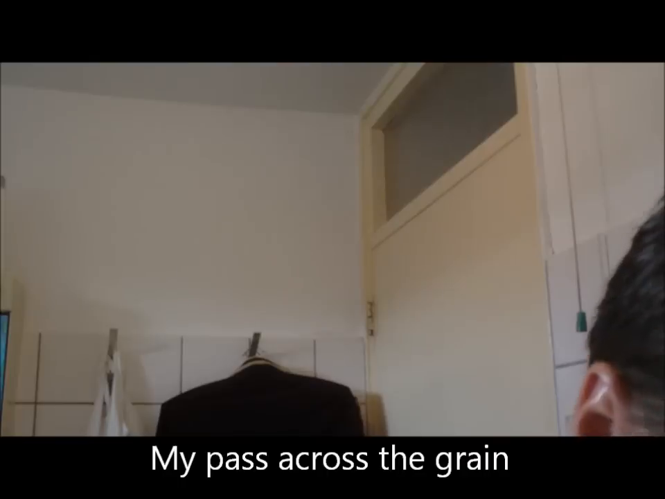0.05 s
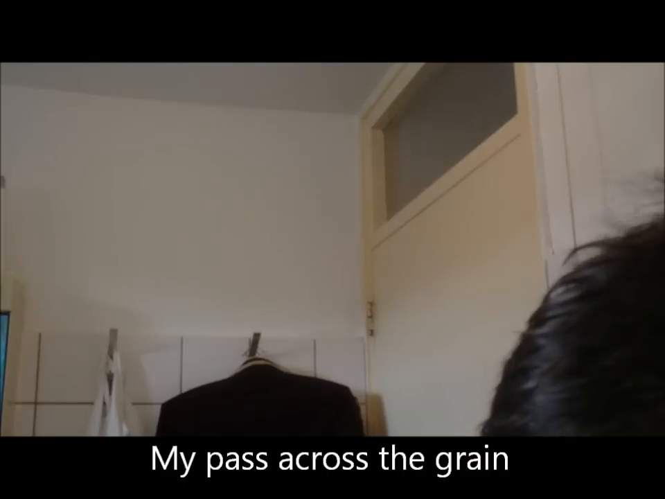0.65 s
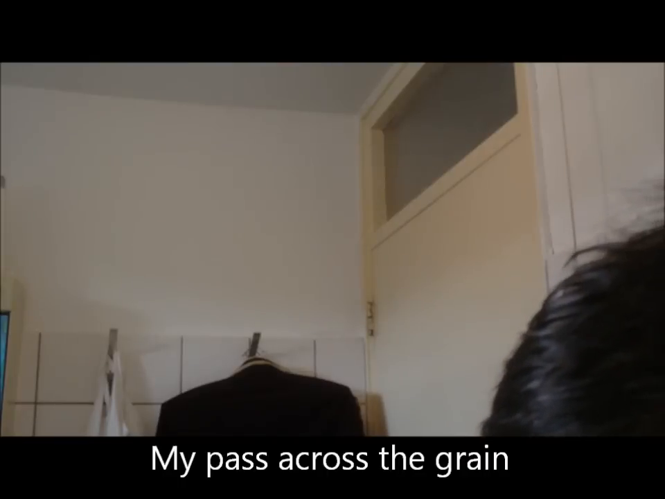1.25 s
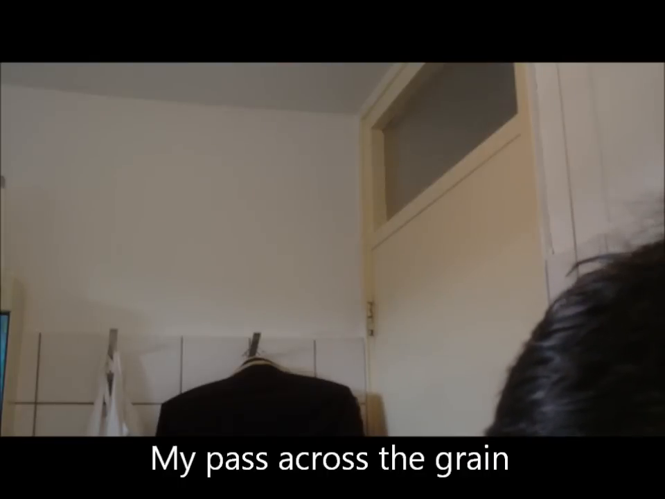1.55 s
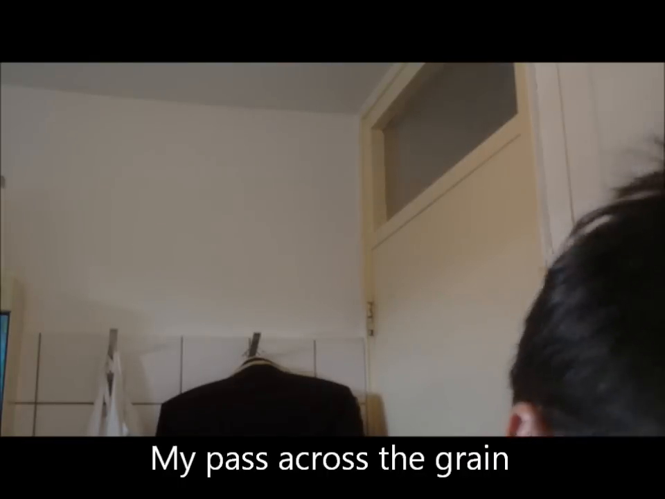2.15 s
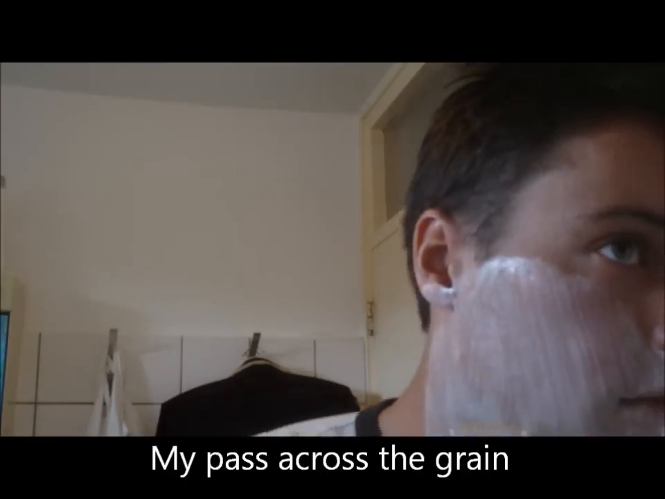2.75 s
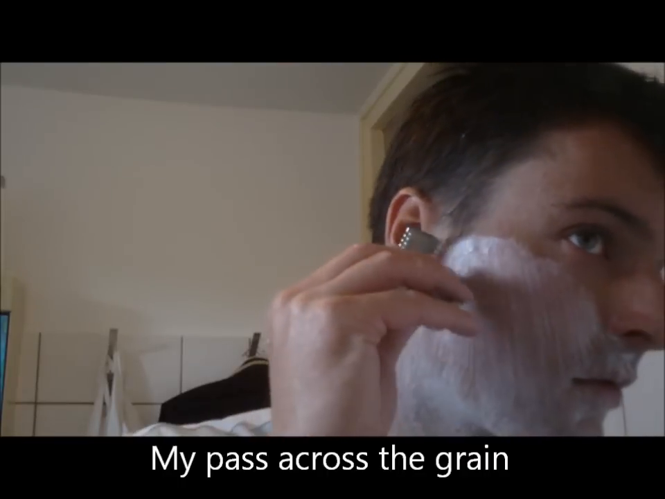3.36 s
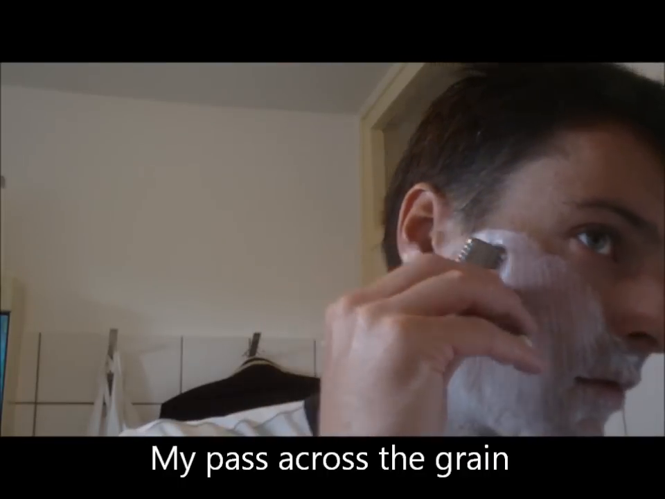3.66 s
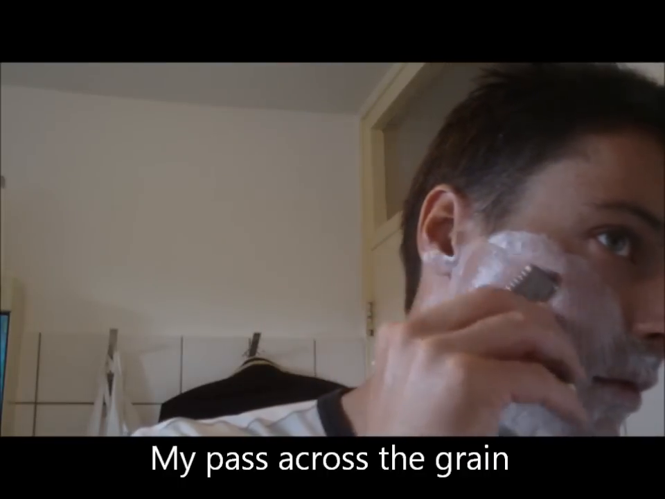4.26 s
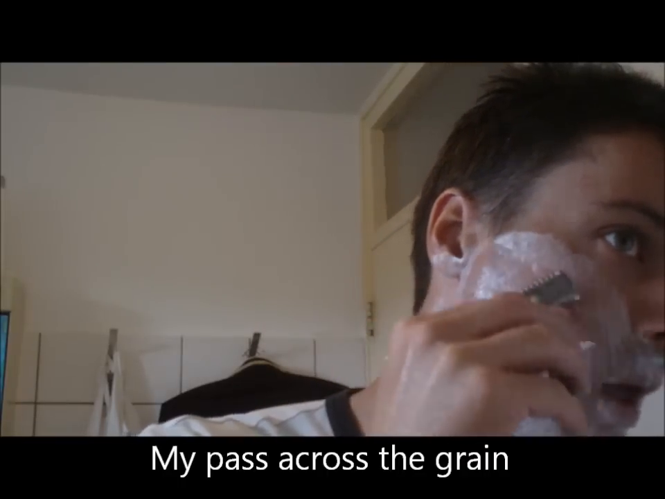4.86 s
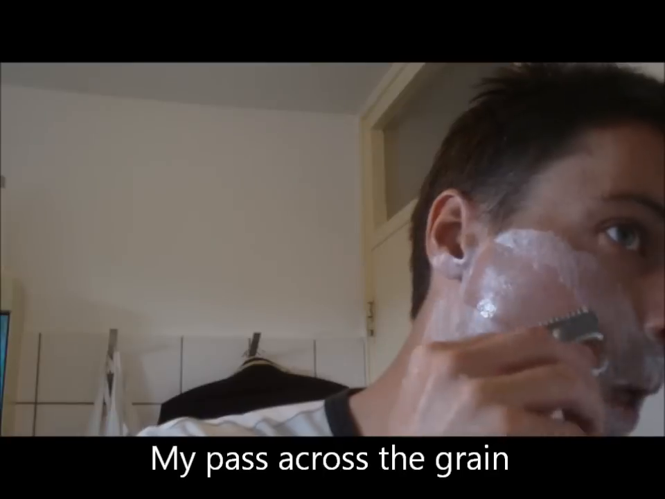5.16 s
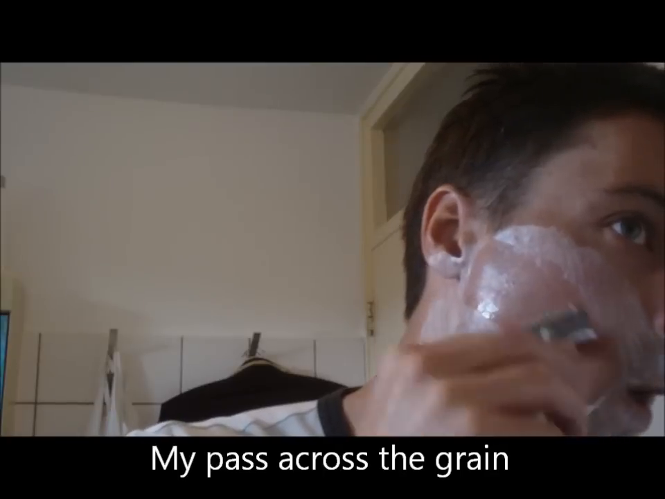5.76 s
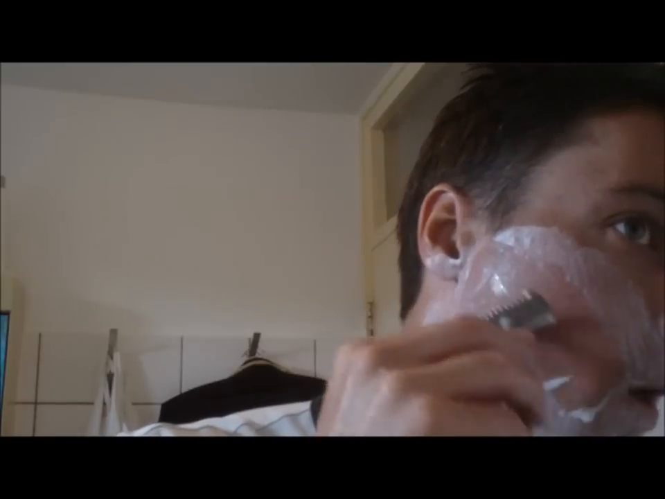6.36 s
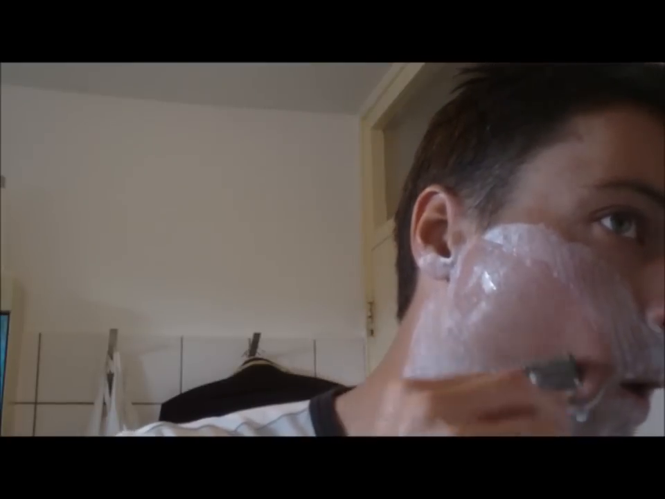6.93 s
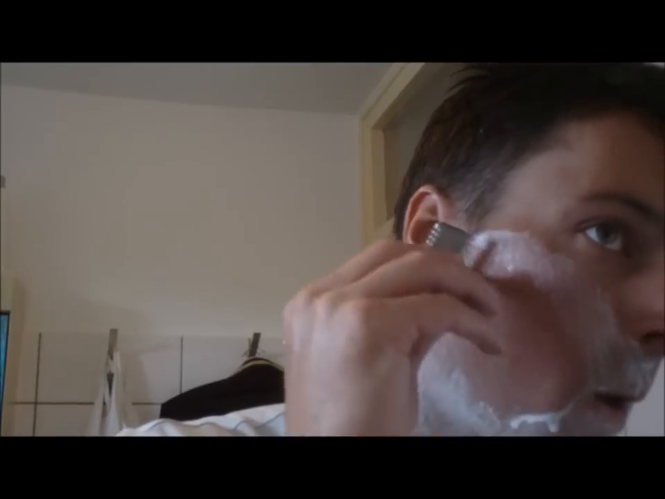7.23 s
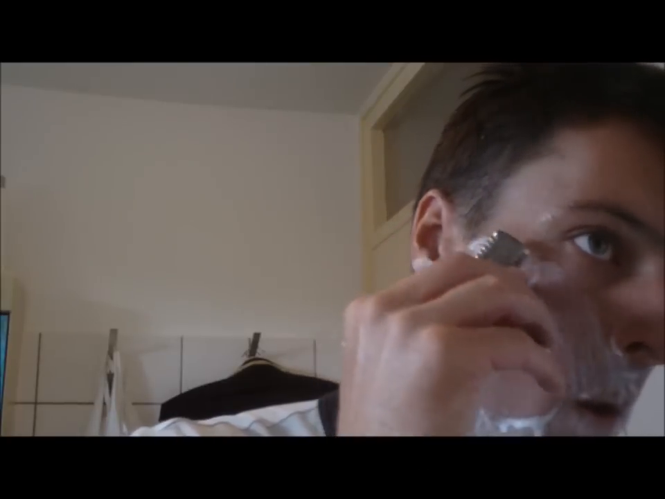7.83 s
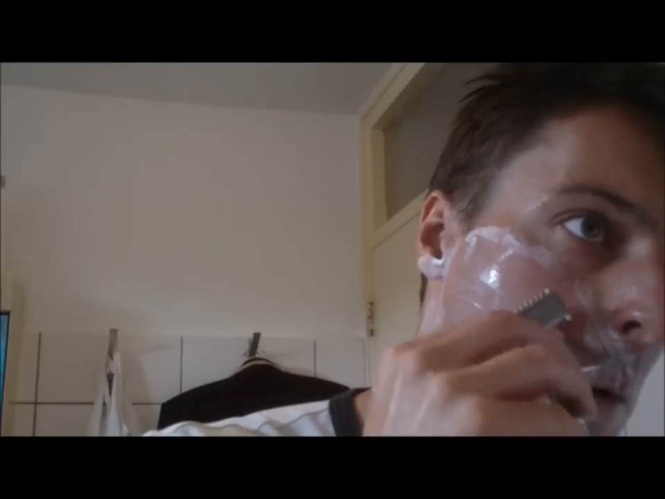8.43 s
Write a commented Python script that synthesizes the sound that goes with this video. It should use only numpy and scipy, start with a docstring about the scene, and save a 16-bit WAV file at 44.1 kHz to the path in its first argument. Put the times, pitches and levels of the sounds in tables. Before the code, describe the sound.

A light, dull knock on a basin opens the scene. At about 0.3 seconds a tap begins to hiss, and from 1 second the water splashes, bubbles and gurgles as a razor is rinsed in the stream. This is the loudest part, peaking between 2 and 2.5 seconds, then dying away by about 3.2 seconds as the tap closes. A handful of drops plink until nearly 4 seconds. From 3.5 seconds to the end, at around 8.6 seconds, the razor scrapes through lathered stubble in about a dozen short, quiet, crisp strokes, two or three a second. Tiny clicks and stray drips fall among them, notably near 4.9, 6.1 and 7.8 seconds. Everything sits straight ahead, with the short echo of a small tiled bathroom. A soft rush of air and a very faint high electrical whine lie underneath throughout.

```python
"""Water runs from a tap, splashing and gurgling as a razor is rinsed in a small tiled bathroom.
The tap is closed, a few last drops plink, and the razor scrapes through stubble in short strokes.
The water hisses in the spout and patters on the basin, and each bubble of trapped air rings like a
tiny bell. The scrape is many hairs snapping, over the hiss of the blade sliding through lather.
The walls echo it all, and a soft rush of air and a faint electrical whine lie underneath."""
import sys
import numpy as np
from scipy import signal
from scipy.fft import rfft, irfft, next_fast_len
from scipy.io import wavfile

SR = 44100
rng = np.random.default_rng(int(sys.argv[2]) if len(sys.argv) > 2 else 0)


def transcribe(signal):
    """Save signal, clipped to [-1, 1], as a 16-bit WAV file at the path in sys.argv[1]."""
    frames = np.atleast_2d(signal).T
    limited = np.clip(frames, -1, 1)
    pcm = np.round(limited * 32767).astype(np.int16)
    wavfile.write(sys.argv[1], SR, pcm)


N = 378819
TIME = np.arange(N) / SR

# two rinses of the razor in the stream, one list each: t/s, spray level/dB, froth level/dB
RINSES = [
    [(0.9, -50, -58), (1.07, -39, -46), (1.224, -48.5, -53), (1.448, -36.5, -40.5), (1.588, -35, -37),
     (1.838, -33.5, -33), (1.978, -41.5, -35), (2.13, -35.5, -58)],
    [(2.16, -42.5, -31.5), (2.22, -34, -35), (2.366, -41, -35.5), (2.472, -35, -29.5), (2.69, -36.5, -42),
     (2.842, -50, -52), (2.978, -48, -41.5), (3.142, -57, -56.5), (3.25, -60, -77)],
]


def from_db(db):
    """Turn decibels into a factor to multiply a sound by."""
    return 10 ** (np.asarray(db) / 20)


def rms_one(x):
    """Scale a sound so that its average power is 1."""
    return x / np.sqrt(np.mean(x ** 2) + 1e-20)


def level(times, db):
    """A volume curve through the given points, silent before and after them."""
    return from_db(np.interp(TIME, times, db, left=-200, right=-200))


def fade_in(start, attack_s):
    """A volume curve that is 0 until the start, then rises smoothly to 1."""
    return 1 - np.exp(-np.clip((TIME - start) / attack_s, 0, 20))


def at_hz(points, hz):
    """Look up a frequency in a table, blending between rows on a musical (log) scale."""
    points = np.array(points)
    return np.interp(np.log(hz + 1e-3), np.log(points[:, 0]), points[:, 1])


def coloured(x, spectrum):
    """Make some frequencies louder and others softer, then scale to power 1."""
    size = next_fast_len(N + SR // 10)
    gains = from_db(at_hz(spectrum, np.arange(size // 2 + 1) * SR / size))
    return rms_one(irfft(rfft(x, size) * gains, size)[:N])


def band(x, low_hz, high_hz, order=2):
    """Keep the part of a sound between two frequencies."""
    edges = [low_hz, min(high_hz, .45 * SR)]
    return signal.sosfilt(signal.butter(order, edges, "band", fs=SR, output="sos"), x)


def ring(x, hz, t60):
    """Each click in x starts a tone that fades by 60 dB in t60 seconds."""
    decay, turn = from_db(-60 / (t60 * SR)), 2 * np.pi * hz / SR
    return signal.lfilter([0, np.sin(turn)], [1, -2 * decay * np.cos(turn), decay * decay], x + 1e-18)


def resonate(x, modes):
    """Pick out the pitches at which an object rings, from rows of f/Hz, width/Hz, gain/dB."""
    return sum(from_db(db) * signal.lfilter(*signal.iirpeak(hz, hz / width, fs=SR), x)
               for hz, width, db in modes)


def add(out, start, sound):
    """Mix a sound in at a start time in seconds."""
    i = int(np.clip(round(start * SR), 0, N - 1))
    out[i:i + len(sound)] += sound[:N - i]


def grains(per_s, spread_db):
    """Clicks at random moments: many small, a few large."""
    draw = rng.uniform(-1, 1, N) * SR / per_s
    out, hit = np.zeros(N), np.abs(draw) < 1
    out[hit] = np.sign(draw[hit]) * from_db(spread_db * np.minimum(-np.log(np.abs(draw[hit])), 4))
    return out


def spurts(per_s, depth, fade_s):
    """An uneven volume curve that jumps up at random moments and quickly falls back."""
    starts = rng.random(N) < per_s / SR
    jumps = signal.lfilter([1], [1, -np.exp(-1 / (fade_s * SR))], starts + 1e-18)
    return rms_one(1 + depth * jumps)


def bubbles(rows, cycles, rise, splash, swell):
    """Each bubble swells, rings and climbs in pitch as it surfaces; its torn skin adds a spatter."""
    out, t = np.zeros(N), TIME[:SR // 8]
    chances, noises = rng.standard_normal(len(rows)), rng.standard_normal((len(rows), len(t)))
    for (start, hz, db), chance, noise in zip(rows, chances, noises):
        age = np.minimum(t * hz / cycles * from_db(1.5 * chance), 3)  # 1 after about `cycles` swings
        phase = 2 * np.pi * np.cumsum(hz * (1 + rise * (age - .15))) / SR
        onset = 1 - np.exp(-(phase / swell) ** 2)
        tone = from_db(-60 * age) * np.sin(phase)
        spatter = splash * from_db(-45 * age) * rms_one(band(noise, hz / 1.4, hz * 1.435, order=4))
        add(out, start, from_db(db) * onset * (tone + spatter))
    return out


def bubble_cloud(births, choices, pitches, cycles):
    """Each click in births rings as a small bubble, at the pitch that choices picks for it."""
    return sum(np.sqrt(hz) * ring(births * (choices == k), hz, cycles / hz)
               for k, hz in enumerate(pitches))


def snaps(rows, t60, width):
    """Sharp hits: each is a tiny burst of noise around its strongest frequency."""
    out, t = np.zeros(N), TIME[:SR // 20]
    for (start, db, hz), noise in zip(rows, rng.standard_normal((len(rows), len(t)))):
        burst = band(noise * from_db(-60 * t / t60), hz / (1 + width), hz * (1 + width))
        add(out, start, from_db(db) * burst / np.abs(burst).max())
    return out


def room_air():
    """A soft, low, steady rush, with a faint difference between the left and right channels."""
    # tone of the background: f/Hz, level/dB
    air_colour = [(20, -34), (40, -20), (65, -7.5), (110, -5.5), (180, -3.5), (380, -6), (900, -11.5),
                  (2000, -19), (4300, -20.5), (6500, -18.5), (10000, -26.5), (15000, -28)]
    middle = coloured(rng.standard_normal(N), air_colour)
    sides = from_db(-20) * coloured(rng.standard_normal(N), air_colour) * [[1], [-1]]
    return from_db(-57) * (middle + sides)


def whine():
    """A faint electrical whine: a thin, narrow hiss that comes in even pulses."""
    hz, width_hz, pulses_per_s = 6205, 486, 59.5
    pulses = 0.083 + (.5 + .5 * np.cos(2 * np.pi * pulses_per_s * TIME)) ** 3
    hiss = band(rng.standard_normal(N) * pulses, hz - width_hz / 2, hz + width_hz / 2)
    return from_db(-68) * rms_one(hiss)


def room_tail():
    """A wash of echoes that dies soonest in the highest notes and booms at a few low ones."""
    # how long the echoes last: f/Hz, time to fade by 60 dB/s
    fade_times = [(100, 0.28), (500, 0.38), (1300, 0.22), (3500, 0.29), (9000, 0.25), (16000, 0.11)]
    # standing waves, the notes that build up between the walls: f/Hz, width/Hz, gain/dB
    wall_notes = [(107, 7, 14), (214, 7, 5), (353, 18, 0), (433, 18, -4), (466, 12, -3), (706, 14, -3),
                  (856, 14, -3), (1044, 14, 0)]
    t, edges = TIME[:SR * 3 // 4], np.geomspace(70, 18000, num=13)
    tail = np.zeros(len(t))
    for low, high in zip(edges, edges[1:]):
        fade = from_db(-60 * t / at_hz(fade_times, np.sqrt(low * high)))
        tail += band(rng.standard_normal(len(t)), low, high) * fade
    tail *= 1 - np.exp(-t / 0.00042)
    boom = from_db(3) * resonate(1. * (t == 0), wall_notes)
    return tail / np.sqrt(np.sum(tail ** 2)) + boom


def bathroom(x, tail, echo_db):
    """A sound arrives directly, then bounces off the near tiles, then lingers as the tail."""
    # first echoes from the tiles: delay/s, gain before echo_db is applied
    tile_echoes = [(.0014, 0.028), (.0036, -0.074), (.0062, -0.053)]
    response = from_db(echo_db) * tail
    response[0] += 1  # the direct sound
    for delay, gain in tile_echoes:
        add(response, delay, from_db([echo_db]) * gain)
    return signal.fftconvolve(x, response)[:N]


def knock():
    """A dull bump sets the basin ringing briefly."""
    # two dull bumps close together: t/s, level/dB
    bumps = [(0.001, -41), (0.015, -41)]
    # notes of the basin: f/Hz, gain/dB, time to fade by 60 dB/s
    basin_notes = [(284.4, -7, 0.31), (347, 3, 0.074), (441, 4.5, 0.071), (620, 1.5, 0.021),
                   (920, -10, 0.03), (1020, 10, 0.013), (1740, -3, 0.057)]
    blows = np.zeros(N)
    for start, db in bumps:
        add(blows, start, from_db([db]))
    ringing = sum(from_db(db) * ring(blows, hz, t60) for hz, db, t60 in basin_notes)
    return band(ringing, 320, 6000)


def drips():
    """Dripping water and lather make small bubbles that plink."""
    # the plinks: t/s, f/Hz, level/dB
    plinks = [(3.225, 7500, -21.5), (3.307, 2200, -38), (3.612, 1840, -33), (3.655, 1410, -36.5),
              (3.68, 2780, -30.5), (3.705, 1970, -30), (3.634, 3780, -34.5), (3.797, 3170, -30),
              (4.816, 3130, -37.5), (4.893, 2200, -33.5), (5.092, 4770, -38), (6.079, 4720, -28),
              (6.879, 4370, -35), (7.187, 1430, -51), (8.256, 4240, -33)]
    return bubbles(plinks, cycles=44, rise=0.2, splash=0.32, swell=6)


def small_clicks():
    """Small sharp clicks: the razor touching the skin, a drop landing, lather popping."""
    # the clicks: t/s, peak level/dB, strongest f/Hz
    clicks = [(4.513, -38.5, 10200), (4.812, -29.5, 6500), (4.893, -30.5, 9800), (4.894, -22, 3340),
              (5.496, -41, 8000), (6.079, -28.5, 5400), (6.501, -39, 8000), (6.79, -43, 9000),
              (7.805, -31, 7100), (7.812, -26.5, 6760), (8.133, -39, 6960), (8.256, -38, 4360),
              (8.283, -33.5, 5800), (8.582, -36, 7000)]
    return snaps(clicks, t60=.013, width=0.3)


def razor_scrape():
    """The blade snaps hairs, more on a firm stroke, and hisses as it slides through lather."""
    # razor strokes: t/s, length of the pull/s, level/dB, hollow ring of the cheek/dB
    strokes = [(3.545, 0.25, -47.5, 4), (4.079, .24, -48, -16), (4.54, .19, -49, -13),
               (4.96, 0.084, -45, 2), (5.245, 0.078, -47.5, 10), (5.539, 0.069, -46.5, 12),
               (6.018, 0.24, -44, -2), (6.501, 0.15, -44, 2), (6.866, 0.1, -45, 6),
               (7.418, 0.2, -47.5, -12), (7.89, 0.1, -52.5, -8), (8.215, 0.072, -52, -13),
               (8.53, .09, -50, 0)]
    # tone of the scrape: f/Hz, level/dB
    stubble_colour = [(300, -34), (900, -19), (1900, -10.5), (2800, -5), (4500, -1), (7800, 3.5), (9200, 0),
                      (12000, -6.5), (15000, -1.5)]
    # ring of the razor head: f/Hz, width/Hz, gain/dB
    head_notes = [(2450, 37, 3.5)]
    bite_s, press_db, ease_db_per_s = 0.019, 4, 251
    cheek_hz, cheek_width_hz, treble_hz = 1380, 470, 10400
    stroke, hollow, bright, age = np.zeros(N), np.zeros(N), np.zeros(N), TIME[:SR]
    for start, length, db, cheek_db in strokes:
        # the blade bites, presses harder along the pull, then eases off
        bite = 1 - np.exp(-age / bite_s)
        press = from_db(-press_db * np.maximum(1 - age / length, 0) ** 2)
        ease = from_db(-ease_db_per_s * np.maximum(age - length, 0))
        pull = from_db(db) * bite * press * ease
        add(stroke, start, pull)
        add(hollow, start, from_db(cheek_db) * pull)
        add(bright, start, from_db(-3.5 - 0.31 * cheek_db) * pull)  # a hollower cheek sounds duller
    hairs_per_s = 700 + 3000 * np.sqrt(stroke / stroke.max())
    hairs = coloured(grains(hairs_per_s, spread_db=3) / np.sqrt(hairs_per_s), stubble_colour)
    tufts = spurts(per_s=60, depth=0.32, fade_s=.008)  # the blade catches on tufts
    lather = coloured(rng.standard_normal(N), stubble_colour)
    scrape = from_db(0.5) * hairs * tufts + from_db(-7) * lather
    treble = signal.sosfiltfilt(signal.butter(2, treble_hz, "high", fs=SR, output="sos"), scrape)
    cheek = band(scrape, cheek_hz - cheek_width_hz / 2, cheek_hz + cheek_width_hz / 2)
    return stroke * (scrape - treble + resonate(scrape, head_notes)) + bright * treble + hollow * cheek


def tap_jet():
    """Water hisses in the spout: faint at first, growing once the tap is open, fading as it closes."""
    # tone of the rushing water: f/Hz, level/dB
    jet_colour = [(100, -6.5), (300, 0), (550, -13), (850, 2.5), (1750, -3.5), (2400, 1), (5500, -4.5),
                  (7500, 3), (10000, -6.5), (15000, -2.5)]
    # notes of the spout: f/Hz, width/Hz, gain/dB
    spout_notes = [(1310, 160, -5), (2970, 110, 2), (3434, 100, -10), (4650, 310, 1), (6500, 190, -3),
                   (7950, 190, -8)]
    leak_s, open_s, close_s, attack_s = 0.21, 0.32, 1.87, 0.046
    grow_db_per_s, fade_db_per_s = 5, 22
    rush = coloured(grains(per_s=18000, spread_db=2.5), jet_colour)
    leak = from_db(-62.5) * fade_in(leak_s, attack_s)
    flow = from_db(-52.5 + grow_db_per_s * (TIME - open_s)) * fade_in(open_s, attack_s)
    closing = from_db(-fade_db_per_s * np.maximum(TIME - close_s, 0))  # outpaces the growth
    return (leak + flow) * closing * rms_one(rush + resonate(rush, spout_notes))


def swarm(per_s, spread_db, low_hz, high_hz, cycles):
    """Tiny bubbles form at random until the rinsing ends, each ringing at one of 20 pitches."""
    wet_samples = np.sum(TIME < RINSES[-1][-1][0])
    births = grains(per_s, spread_db)[:wet_samples]
    choices = rng.integers(0, 20, N)[:wet_samples]
    cloud = bubble_cloud(births, choices, np.geomspace(low_hz, high_hz, 20), cycles)
    return np.pad(rms_one(band(cloud, low_hz, 1.27 * high_hz)), (0, N - wet_samples))


def spray():
    """Spray patters and fizzes on the basin and whips up a froth of larger bubbles."""
    # tone of the patter: f/Hz, level/dB
    spray_colour = [(200, -55), (700, -35), (1500, -12), (3000, 4), (6000, -7), (8000, 3.5), (10200, 1),
                    (13000, 9), (15000, 2.5)]
    droplets = coloured(grains(per_s=1700, spread_db=1), spray_colour)
    patter = from_db(-8) * droplets * spurts(per_s=70, depth=8.6, fade_s=0.0074)
    fizz = from_db(-0.5) * swarm(per_s=370, spread_db=7, low_hz=4200, high_hz=9000, cycles=21)
    froth = from_db(-4.5) * swarm(per_s=440, spread_db=7, low_hz=1140, high_hz=4800, cycles=27)
    times, spray_db, froth_db = np.concatenate(RINSES).T
    rinsing = level(times, spray_db) * (patter + fizz) + level(times, froth_db) * froth
    return fade_in(times[0], attack_s=0.11) * rinsing


def gurgle():
    """Gulps of trapped air ring and break into smaller bubbles, while water drums on the basin."""
    # gulps of air under the water: t/s, f/Hz, level/dB
    gulps = [(0.982, 720, -31), (1.09, 768, -37), (1.445, 655, -31), (1.503, 820, -22.5),
             (1.645, 758, -19.5), (1.686, 1020, -14.5), (1.775, 527, -18.5), (1.857, 462, -22.5),
             (1.915, 440, -13.5), (1.98, 488, -15), (2.03, 620, -30), (2.194, 920, -21.5),
             (2.222, 1173, -13), (2.398, 521, -9), (2.504, 604, -22), (2.575, 485, -13), (2.696, 592, -14),
             (2.745, 724, -26), (2.827, 914, -19), (2.965, 1030, -17), (3.099, 1020, -24),
             (3.135, 976, -29.5)]
    attack_s, fade_s = 0.011, 0.047
    power, age = np.zeros(N), TIME[:SR // 2]
    surge = (1 - np.exp(-age / attack_s)) * np.exp(-age / fade_s)
    for start, _, db in gulps:
        add(power, start, (from_db(db) * surge) ** 2)
    # the small bubbles follow the gulps' notes, mostly a little higher
    times, notes, _ = np.transpose(gulps)
    octaves_above = 0.2 + 0.3 * rng.standard_normal(N)
    wanted_hz = np.interp(TIME, times, notes) * 2 ** octaves_above
    pitches = np.geomspace(330, 1400, num=14)
    births = grains(per_s=300, spread_db=3)
    cloud = bubble_cloud(births, np.searchsorted(pitches, wanted_hz), pitches, cycles=16)
    sputter = from_db(-18) * rms_one(band(cloud, 432, 1800, order=3))
    drumming = from_db(-34.5) * rms_one(band(grains(per_s=190, spread_db=1.5), 115, 340))
    glugs = bubbles(gulps, cycles=20.4, rise=0.047, splash=0.23, swell=7.1)
    return np.sqrt(power) * (sputter + drumming) + glugs


def splats():
    """Water slaps on the basin."""
    # the slaps: t/s, peak level/dB, strongest f/Hz
    slaps = [(0.002, -24.5, 1580), (0.005, -31, 3880), (0.362, -37, 4930), (1.406, -5, 5000),
             (1.636, -13.5, 5200), (1.816, -14.5, 8100), (1.837, -11.5, 4200), (1.962, -11.5, 3440),
             (2.000, -10.5, 5950), (2.075, -15.5, 6500), (2.137, -14, 6500), (2.261, -13, 12200),
             (2.364, -12, 4120), (2.398, -8, 4490), (2.438, -8.5, 1790), (2.535, -20, 5100),
             (2.695, -17, 4800), (2.925, -19.5, 6500), (2.999, -23, 2260), (3.037, -32, 15000),
             (3.135, -28.5, 4670)]
    return snaps(slaps, t60=0.01, width=0.54)


def stream_bubbles():
    """Big bubbles ring in the stream; stray ones rise by chance, louder when the froth is louder."""
    # the largest bubbles: t/s, f/Hz, level/dB
    largest = [(0.422, 845, -38), (1.03, 1800, -26), (1.061, 4080, -19), (1.131, 6940, -19),
               (1.165, 5080, -11.5), (1.184, 1770, -28), (1.223, 2440, -16), (1.3, 1610, -27),
               (1.379, 2840, -17.5), (1.583, 2470, -16.5), (1.636, 2820, -12), (1.747, 2440, -11),
               (1.915, 2990, -7), (1.98, 6540, -6), (1.995, 4720, -5.5), (2.161, 4240, -16),
               (2.253, 3160, -7.5), (2.33, 4260, -4), (2.349, 6000, -4), (2.438, 2760, -18.5),
               (2.536, 2590, -15.5), (2.808, 5600, -16), (2.87, 7200, -13.5), (2.999, 2670, -19.5)]
    strays_per_s, low_hz, high_hz, over_froth_db = 32, 2200, 8200, 15
    times, _, froth_db = np.concatenate(RINSES).T
    delay, pitch, size = rng.random((200, 3)).T
    born = times[0] + (np.arange(len(delay)) + delay) / strays_per_s
    hz = low_hz * (high_hz / low_hz) ** pitch
    db = np.interp(born, times, froth_db) + over_froth_db + 6 * (size - .5)
    strays = np.transpose([born, hz, db])[born < times[-1]]
    return bubbles([*largest, *strays], cycles=24, rise=0.13, splash=0.33, swell=6.9)


def scene():
    """Water and razor share one room, straight ahead of the listener, over a quiet background."""
    tail = room_tail()
    stream = tap_jet() + spray() + gurgle() + splats() + stream_bubbles()
    basin = bathroom(stream + knock(), tail, echo_db=-0.5)
    dripping = bathroom(drips(), tail, echo_db=1.5)
    shaving = bathroom(razor_scrape() + small_clicks(), tail, echo_db=-5.5)
    return room_air() + whine() + dripping + shaving + basin


def record(dry):
    """The microphone loses the deep bass and the very top; its opening swallows one high band."""
    bass_hz, opening_hz, top_hz = 50, 11270, 15500
    pair = dry * from_db([[-.05], [.05]])  # left, right
    thin = signal.sosfilt(signal.butter(2, bass_hz, "high", fs=SR, output="sos"), pair)
    notched = signal.lfilter(*signal.iirnotch(opening_hz, 5.5, fs=SR), thin)
    return signal.sosfilt(signal.ellip(12, .1, 80, top_hz, fs=SR, output="sos"), notched)


dry = scene()
out = record(dry)
transcribe(out)
```